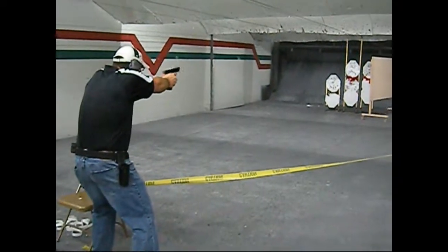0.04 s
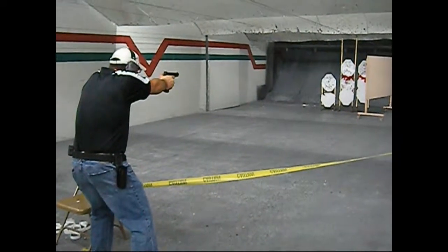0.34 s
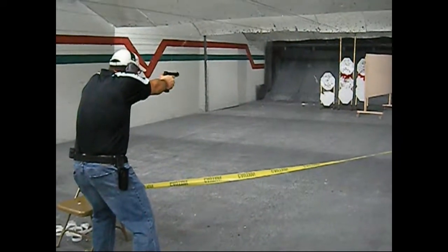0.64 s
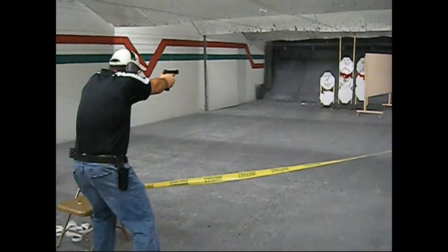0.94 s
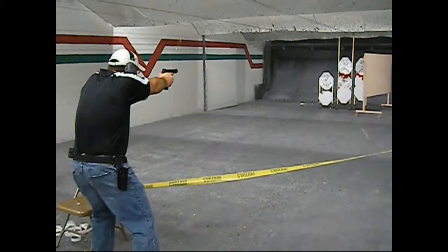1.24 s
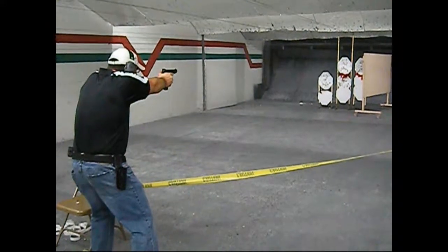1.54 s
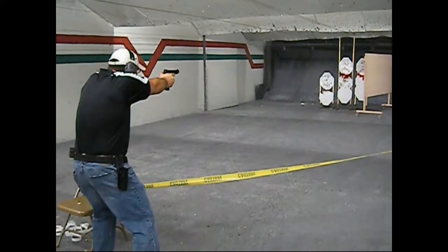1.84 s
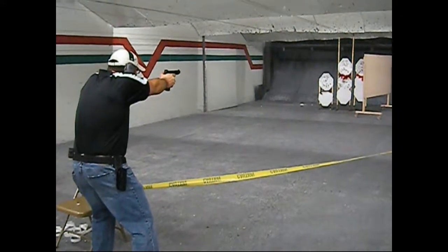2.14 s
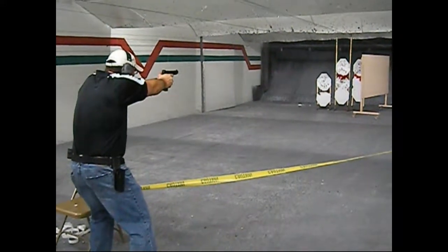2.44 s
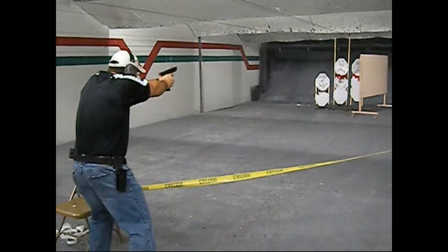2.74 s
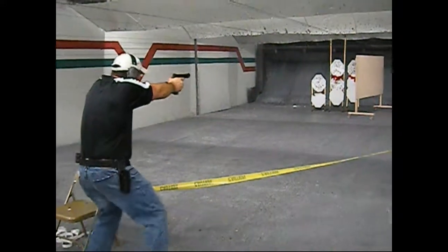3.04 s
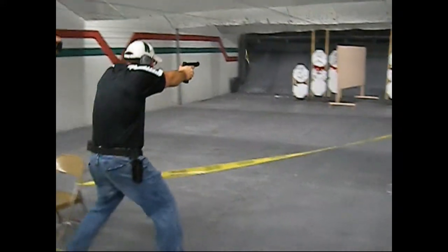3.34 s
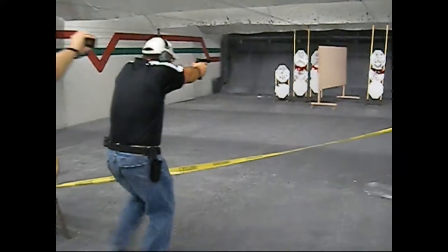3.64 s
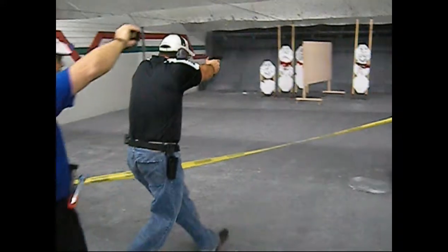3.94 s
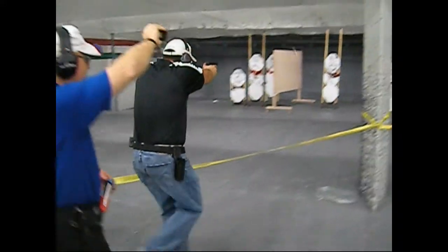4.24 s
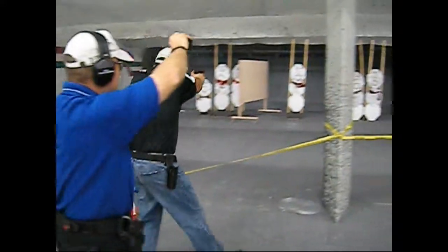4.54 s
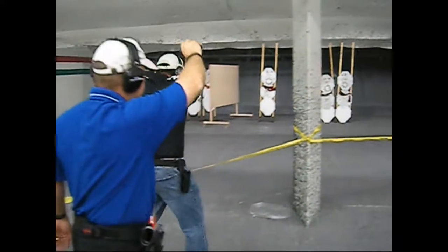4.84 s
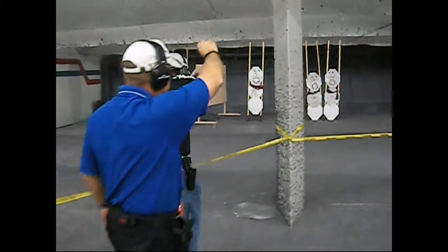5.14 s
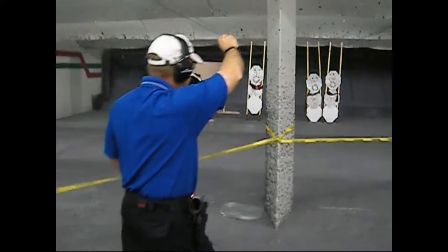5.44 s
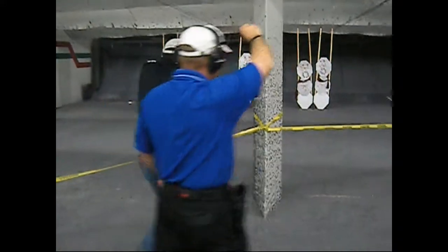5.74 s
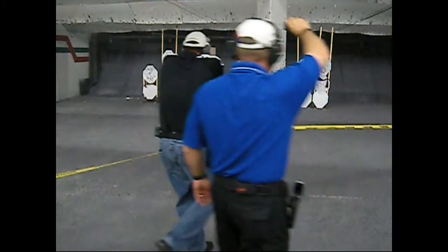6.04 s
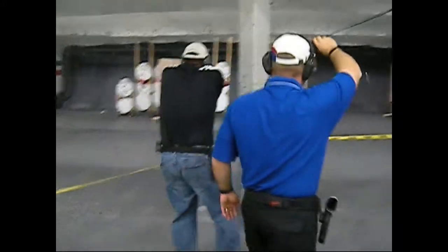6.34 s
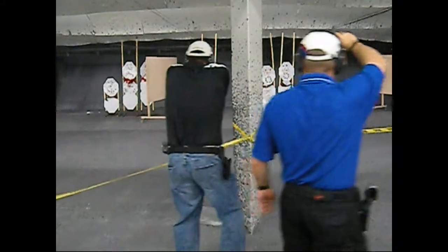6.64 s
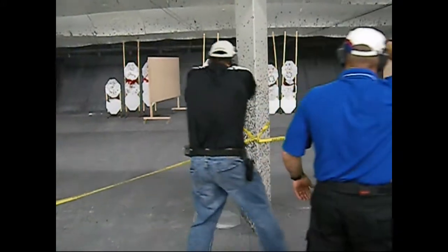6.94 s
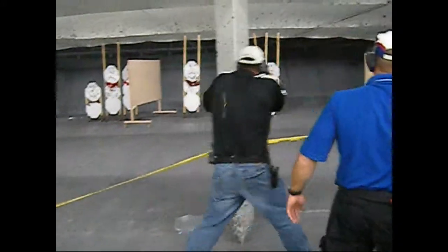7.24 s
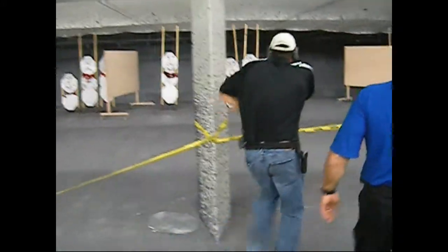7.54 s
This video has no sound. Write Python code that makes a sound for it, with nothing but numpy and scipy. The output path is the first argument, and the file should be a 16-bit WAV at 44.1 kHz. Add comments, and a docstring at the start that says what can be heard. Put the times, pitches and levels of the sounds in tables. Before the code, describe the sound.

The sound opens in the roaring echo of a shot just fired inside a concrete shooting range. A pistol then fires six loud, evenly paced shots at about 0.2, 0.7, 1.3, 1.8, 2.4 and 2.9 seconds. Each is a sharp crack with a low punch, a hard slap off a nearby wall and a faint pitched flutter. After a one-second pause filled with echo, five more shots come at about 3.9, 4.5, 5.3, 5.9 and 6.8 seconds, slightly slower and less punchy. Every blast overloads the small, close microphone, which clips, ducks and recovers, so the dense roar of the hall stays level for almost half a second and runs into the next shot. The treble is dull, and ventilation rushes very faintly underneath. The last echo is still fading at about 7.5 seconds.

```python
"""Concrete indoor range: a pistol fires a string of shots, first by a side wall, then on the move.
Each blast overloads a small camera's microphone, returns from floor, ceiling and walls, and fills
the hall with a long roar of dense echoes. Ventilation rushes faintly underneath.
The camera's gain control ducks at each shot and recovers as the hall dies away,
so the roar stays level for almost half a second."""
import sys
import numpy as np
from scipy import signal
from scipy.fft import rfft, irfft, next_fast_len
from scipy.io import wavfile

SR = 44100
rng = np.random.default_rng(int(sys.argv[2]) if len(sys.argv) > 2 else 0)


def materialize(psi):
    """Save the field psi as 16-bit PCM at rate SR to the path in sys.argv[1].

    A 1-D psi becomes a single channel; in a 2-D psi each row is a channel.
    """
    bounded = np.clip(np.atleast_2d(psi).T, -1, 1)
    quanta = np.round(bounded * 32767).astype(np.int16)
    wavfile.write(sys.argv[1], SR, quanta)


N = 335160

# Shots and their push on the microphone: start_s, level_db, push_db, push_length_s, second_throw_db
SHOTS = [(-.35, 4, 16, .015, -12.5), (0.1766, 0.5, 14.5, 0.023, 2), (0.714, 1, 16, 0.019, 13),
         (1.3368, 2, 15, 0.021, -18.5), (1.814, -0.9, 15.5, 0.02, -19), (2.4076, -1.5, 15, 0.015, -23),
         (2.884, -1, 15, 0.017, -8.5), (3.932, 2.5, 15.5, 0.005, 3.5), (4.533, 1.2, 13, 0.006, -13),
         (5.2793, 0.2, 12.5, 0.0058, -11.5), (5.897, -.5, 12.5, .013, 5), (6.8019, -0.5, 10.5, .005, -10.5)]
# Direct shock, floor and ceiling bounces: delay_s, crack_db, spike_db (relative to the push)
SHOCK_PATHS = [(0, 6.5, -8), (.0044, -2, -7.5), (.0095, 0, -5.5)]
# Crack spectrum: freq_hz, density_db
CRACK_SPECTRUM = [(40, 0.5), (250, 0), (700, 4.5), (1500, -3.5), (3000, 0), (4200, -10.5), (5500, -17.5)]
# Wall that answers first: time_s, distance_m
WALL_DISTANCE = [(2.9, 3.1), (3.93, 7.5), (4.53, 7), (5.28, 5.5), (5.9, 5), (6.8, 4.7)]
# Wall slap spectrum: freq_hz, density_db
SLAP_SPECTRUM = [(40, -1.5), (280, 9), (700, 12.5), (1500, -3), (3000, 0), (4200, -11.5), (5500, -24)]
# Roar spectrum at onset, also the ventilation's: freq_hz, density_db
ROAR_SPECTRUM = [(20, -20), (45, -13.5), (75, -13), (115, -9), (190, -5), (240, -2), (400, -1.5), (640, 1),
                 (900, -2.6), (1300, -6.5), (2000, -8), (3000, -6), (3900, -14.5), (4800, -17)]
# Side wall's colour on the roar: freq_hz, gain_db
SIDE_WALL_EQ = [(70, -1), (165, 3), (245, -1), (375, 3), (600, -1), (830, 2), (1300, 1), (2000, 0.5),
                (3400, 3.5)]
# Standing wave of the hall: freq_hz, half_width_hz, gain_db
STANDING_WAVE = (281, 24, 2.7)
# Hall decay: freq_hz, t60_s
HALL_DECAY = [(60, 2.65), (200, 2.5), (550, 2.8), (1400, 2.406), (2800, 1.63), (5000, 1.52)]
# Pitched echoes by the side wall: delay_s, pitch_hz, half_length_s, level_db
FLUTTER_ECHOES = [(0.121, 812.3, 0.0095, -2), (0.263, 200, .02, -17.5)]
# Camera's treble droop: freq_hz, gain_db
CAMERA_EQ = [(2800, 0), (4000, -2.5), (5000, -6)]
# Acoustics by the side wall: roar_db, crack_db, spike_db (relative to the push), punch_db, wall_db,
# wall_push_db, far_db, hollow_db (early cut in the roar's low midrange), bright_db_per_octave
WALL_STANCE = dict(roar_db=6, crack_db=8, spike_db=-2.5, punch_db=6.5, wall_db=8.5, wall_push_db=13, far_db=-6.5, hollow_db=1, bright_db_per_octave=-0.09)
# Acoustics on the open floor: same keys
FLOOR_STANCE = dict(roar_db=2, crack_db=5.5, spike_db=-9, punch_db=-3, wall_db=3, wall_push_db=2.5, far_db=-3.5, hollow_db=-3, bright_db_per_octave=0.91)

LEAVES_WALL_S, SWAY_M, WALK_M_PER_S, SOUND_M_PER_S = 3.4, 0.0084, 0.5, 343
PUNCH_HZ, PUNCH_RISE_S = 199.4, 0.0036  # brief ring between floor and ceiling
SECOND_THROW_DELAY_S, FAR_WALL_DELAY_S = 0.031, 0.076
BAND_HZ, TOP_HZ = 5150, 16000


def amp(db):
    """Decibels to gain."""
    return 10 ** (np.asarray(db) / 20)


def unit(x):
    """Scale to rms 1."""
    return x / np.sqrt(np.mean(x ** 2) + 1e-20)


def along(points, hz):
    """Interpolate (freq_hz, value) points on a log axis."""
    freq_hz, values = np.transpose(points)
    return np.interp(np.log(hz + 1), np.log(freq_hz + 1), values)


def filtered(x, response):
    """Apply a frequency response."""
    size = next_fast_len(len(x) + 8192)
    return irfft(rfft(x, size) * response(np.fft.rfftfreq(size, 1 / SR)), size)[:len(x)]


def noise(count, spectrum):
    """Shaped noise, rms 1."""
    return unit(filtered(rng.standard_normal(count), lambda hz: amp(along(spectrum, hz))))


def lagged(x, lag_s):
    """One-pole smoothing, settled at the start."""
    pole = np.exp(-1 / (lag_s * SR))
    return signal.lfilter([1 - pole], [1, -pole], x, zi=[pole * x[:SR // 100].mean()])[0]


def add(track, start_s, x):
    """Mix x into the track."""
    start = round(start_s * SR)
    x = x[max(-start, 0):]
    span = track[max(start, 0):][:len(x)]
    span += x[:len(span)]


def bump(t, rise_s):
    """One-sided pulse of height 1."""
    return t / rise_s * np.exp(1 - t / rise_s)


def stance_at(time_s):
    """Acoustics of the shooter's spot."""
    return WALL_STANCE if time_s < LEAVES_WALL_S else FLOOR_STANCE


def crack(t, spectrum, decay_s):
    """Burst of torn air, dying fast."""
    return noise(len(t), spectrum) * np.exp(-t / decay_s)


def capsule_throw(t, length_s):
    """The overloaded capsule is thrown to one side and swings back past rest."""
    return (t / length_s - 1) * np.exp(-t / length_s) * (1 - np.exp(-t / 0.0009))


def muzzle_blast(t, spot, push_db, push_length_s):
    """Shock, first bounces, their low punch and the slow push on the microphone."""
    push = amp(push_db) * capsule_throw(t, push_length_s)
    punch = amp(spot["punch_db"]) * np.sin(2 * np.pi * PUNCH_HZ * (t - 0.001)) * bump(t, PUNCH_RISE_S)
    out = push - punch
    for delay_s, crack_db, spike_db in SHOCK_PATHS:
        spike = amp(push_db + spot["spike_db"] + spike_db) * bump(t, rise_s=0.00052)
        burst = amp(spot["crack_db"] + crack_db) * crack(t, CRACK_SPECTRUM, decay_s=0.0037)
        add(out, delay_s, burst + spike)
    return out


def wall_slap(t, spot):
    """The nearest wall returns the blast as a short, flat-topped slap."""
    envelope = (1 - np.exp(-t / 0.00072)) * np.exp(-(t / 0.0065) ** 4)
    burst = amp(spot["wall_db"]) * crack(t, SLAP_SPECTRUM, decay_s=0.021)
    push = amp(spot["wall_push_db"]) * np.exp(-t / 0.0071)
    return envelope * (burst + push)


def blasts():
    """Each shot arrives directly, then off the near and far walls; some throw the capsule twice."""
    out, t = np.zeros(N), np.arange(SR // 4) / SR
    for start_s, level_db, push_db, push_length_s, second_throw_db in SHOTS:
        spot = stance_at(start_s)
        wall_delay_s = 2 * np.interp(start_s, *np.transpose(WALL_DISTANCE)) / SOUND_M_PER_S
        add(out, start_s, amp(level_db) * muzzle_blast(t, spot, push_db, push_length_s))
        add(out, start_s + wall_delay_s, amp(level_db) * wall_slap(t, spot))
        add(out, start_s + SECOND_THROW_DELAY_S, amp(second_throw_db) * capsule_throw(t, length_s=0.025))
        far_echo = crack(t, CRACK_SPECTRUM, decay_s=0.025)
        add(out, start_s + FAR_WALL_DELAY_S, amp(level_db + spot["far_db"]) * far_echo)
    return out


def scatter(t):
    """Early echo cluster off ceiling beams and pillars."""
    return amp(2) * bump(np.maximum(t - 0.022, 0), rise_s=0.012) * crack(t, CRACK_SPECTRUM, decay_s=0.14)


def moved(echoes, step_m):
    """Echo pattern after a step: only waves much longer than the step keep their shape."""
    coherence = lambda hz: np.exp(-2 * np.pi * hz * abs(step_m) / SOUND_M_PER_S)
    fresh = rng.standard_normal(len(echoes))
    return filtered(echoes, coherence) + filtered(fresh, lambda hz: np.sqrt(1 - coherence(hz) ** 2))


def roar_colour_db(hz, spot, by_wall):
    """Roar spectrum at one spot: standing wave, side wall, tilt."""
    mode_hz, half_width_hz, mode_db = STANDING_WAVE
    standing_db = mode_db * np.exp(-((hz - mode_hz) / half_width_hz) ** 2)
    tilt_db = spot["bright_db_per_octave"] * np.log2(hz / 1000 + 0.19)
    return along(ROAR_SPECTRUM, hz) + standing_db + by_wall * along(SIDE_WALL_EQ, hz) + tilt_db


def roar(t, echoes, spot, by_wall):
    """Dense echoes off bare concrete thicken, then fade, treble first."""
    coloured = unit(filtered(echoes, lambda hz: amp(roar_colour_db(hz, spot, by_wall))))
    hz, age_s, frames = signal.stft(coloured, SR, nperseg=512)
    fade_db = 60 * age_s / along(HALL_DECAY, hz)[:, None]
    # by the wall, the low midrange returns late from the hall's far end
    low_mid = np.exp(-(np.log2(hz / 550 + 0.014) / 0.56) ** 2)
    hollow_db = spot["hollow_db"] * np.outer(low_mid, np.exp(-age_s / 0.098))
    tail = signal.istft(frames * amp(-fade_db - hollow_db), SR, nperseg=512)[1][:len(t)]
    return tail * (1 - np.exp(-t / 0.032))


def flutter(t):
    """Evenly spaced surfaces return the shock as brief pitched echoes."""
    out = np.zeros(len(t))
    for delay_s, pitch_hz, half_length_s, level_db in FLUTTER_ECHOES:
        envelope = np.exp(-((t - delay_s) / half_length_s) ** 2)
        out += amp(level_db) * envelope * np.sin(2 * np.pi * (pitch_hz * t + rng.random()))
    return out


def hall():
    """The hall's answer as the shooter sways, then walks; shots from one spot ring alike."""
    out, t = np.zeros(N), np.arange(2 * SR) / SR
    echoes, previous_s = rng.standard_normal(len(t)), SHOTS[0][0]
    for start_s, level_db, *_ in SHOTS:
        spot, by_wall = stance_at(start_s), start_s < LEAVES_WALL_S
        step_m = SWAY_M if by_wall else WALK_M_PER_S * (start_s - previous_s)
        echoes = moved(echoes, step_m)
        tail = roar(t, echoes, spot, by_wall) + by_wall * flutter(t)
        add(out, start_s, amp(level_db + spot["roar_db"]) * tail)
        add(out, start_s, amp(level_db) * scatter(t[:SR // 4]))
        previous_s = start_s
    return out


def ventilation():
    """Faint, steady rush of air."""
    return amp(-29) * noise(N, ROAR_SPECTRUM)


def scene():
    """Ventilation, shots and hall, mono."""
    return (ventilation() + blasts() + hall())[None]


def gain_control(x, limit_db, release_db_per_s, sense_s, attack_s):
    """Gain drops fast above the limit and climbs back steadily."""
    level_db = 10 * np.log10(lagged(x ** 2, sense_s) + 1e-12)
    over_db = np.maximum(level_db - limit_db, 0)
    climb_db = release_db_per_s * np.arange(N) / SR
    held_db = np.maximum.accumulate(over_db + climb_db) - climb_db
    return x * amp(-lagged(held_db, attack_s))


def record(dry):
    """The camera rides its gain, clips and narrows the band; overshoots clip again."""
    x = gain_control(dry[0], limit_db=-9.0, release_db_per_s=32.5, sense_s=0.019, attack_s=0.0066)
    x = filtered(x, lambda hz: 1j * hz / (1j * hz + 1.0))  # steady pressure leaks away
    x = np.clip(x, -1, 1)
    x = filtered(x, lambda hz: amp(along(CAMERA_EQ, hz)))
    x = filtered(x, lambda hz: 1 / np.sqrt(1 + (hz / BAND_HZ) ** 52))
    x = np.clip(x, -0.97, 0.97)
    # faint, steady high hiss under everything
    hiss = amp(-72.5) * unit(filtered(rng.standard_normal(N), lambda hz: 1 / (1 + (hz / 8000) ** 4)))
    x = filtered(x + hiss, lambda hz: 1 / np.sqrt(1 + (hz / 12000) ** 4))
    return filtered(x, lambda hz: hz < TOP_HZ)[None]


dry = scene()
out = record(dry)
materialize(out)
```